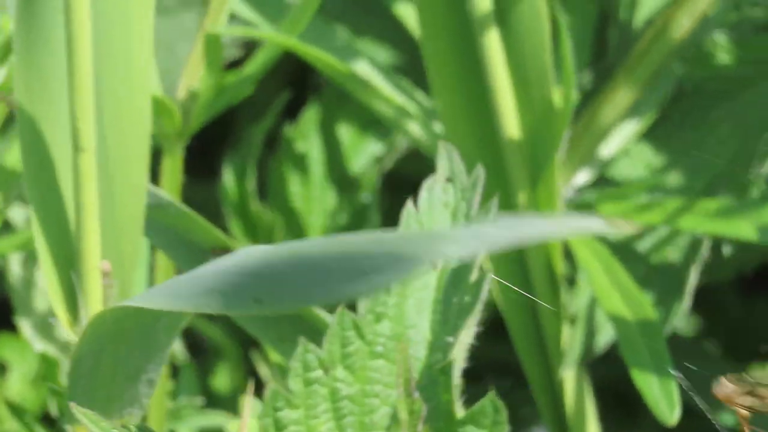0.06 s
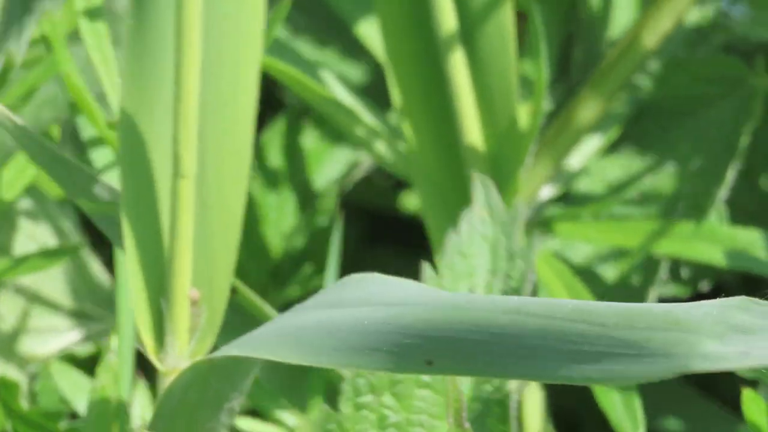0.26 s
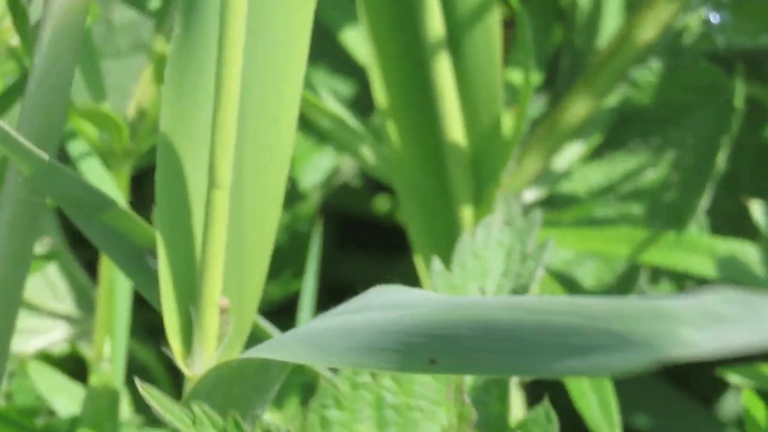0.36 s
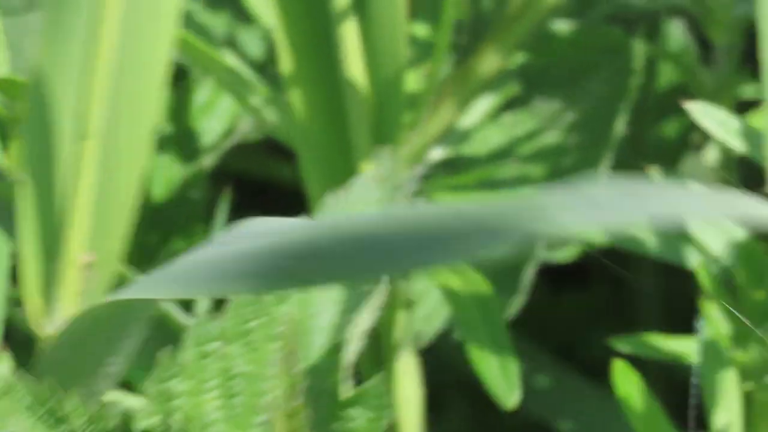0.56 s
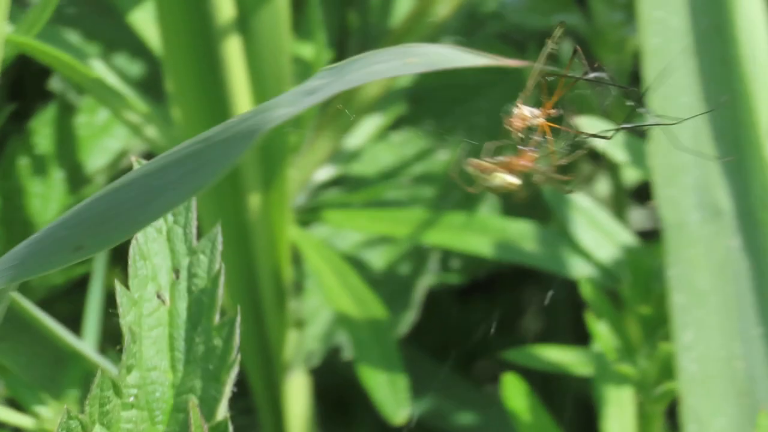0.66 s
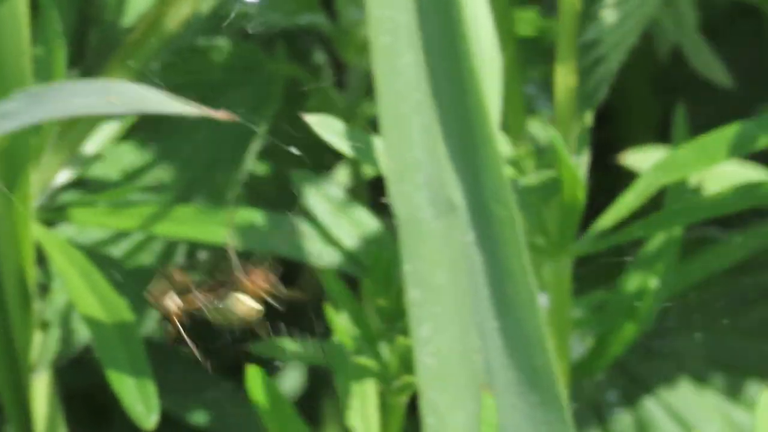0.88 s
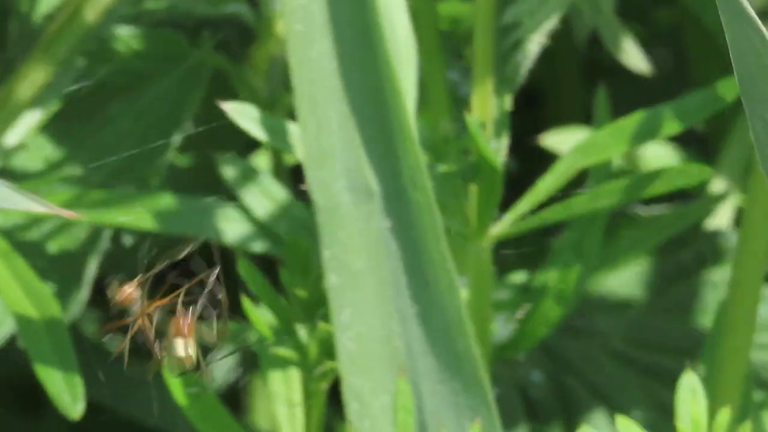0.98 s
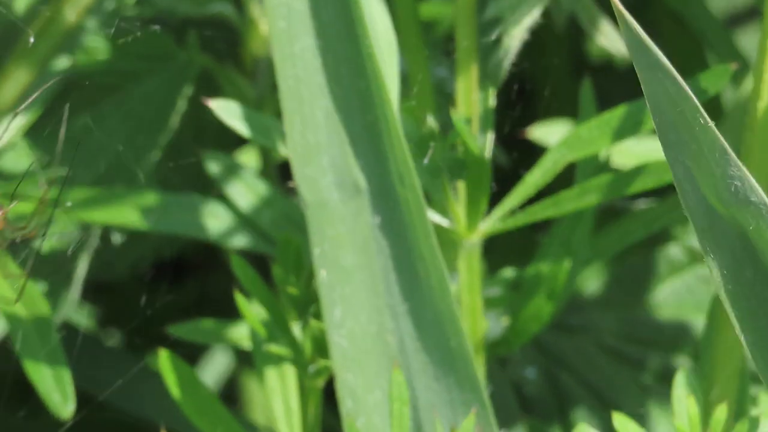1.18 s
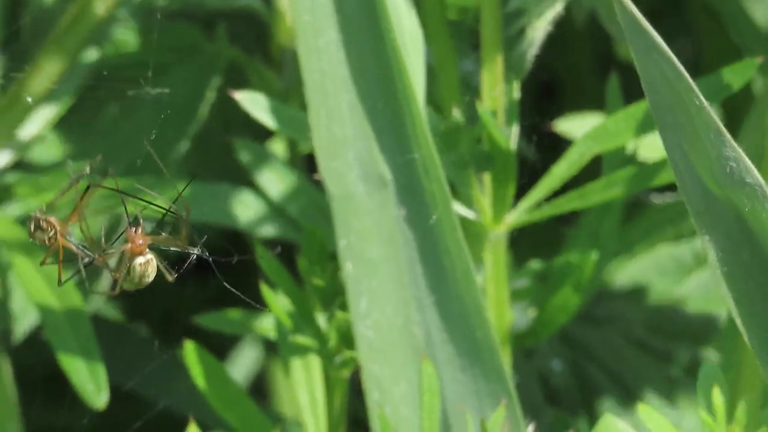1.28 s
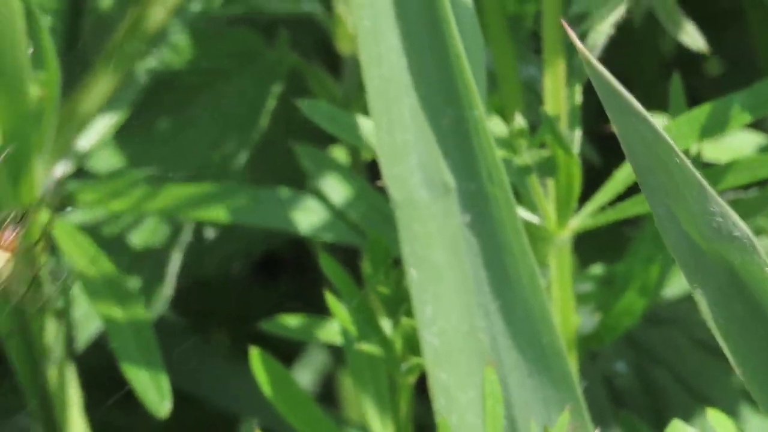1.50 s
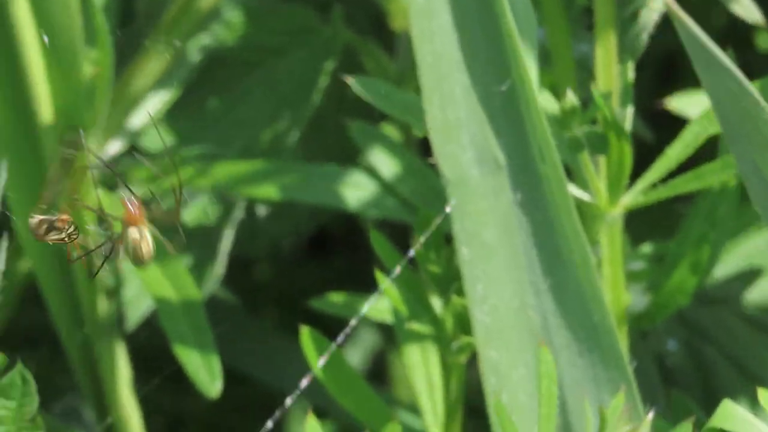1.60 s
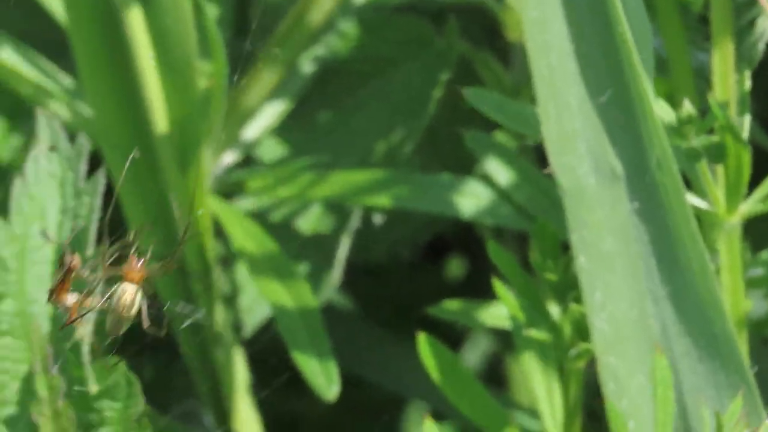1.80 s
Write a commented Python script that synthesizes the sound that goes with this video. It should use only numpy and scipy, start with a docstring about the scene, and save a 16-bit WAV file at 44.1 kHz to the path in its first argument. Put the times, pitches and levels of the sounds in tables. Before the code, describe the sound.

Wind buffets the microphone low among grass, with a lumpy rumble and irregular soft thumps from about 0.2 seconds. A brief airy swish passes at 1.1 seconds, then the strongest gust hits from 1.2 to 1.4 seconds with a breathy hum. The rumble eases but continues until nearly 2 seconds. Behind it lie steady distant rumble, soft leaf hiss and a very faint ringing that swells and fades.

```python
"""Wind gusts right on a camera's two microphone ports, set low among grass and nettles.
Eddies thump the ports over an uneven rumble of turbulent air. The strongest gust blows a breathy
hum in the housing, with a brief swish of passing air just ahead of it.
Farther off lies a steady outdoor wash, distant rumble and leaf hiss, with a faint ringing band."""
import sys
import numpy as np
from scipy import signal
from scipy.fft import rfft, irfft, next_fast_len
from scipy.io import wavfile
from scipy.ndimage import uniform_filter1d

SR = 44100
rng = np.random.default_rng(int(sys.argv[2]) if len(sys.argv) > 2 else 0)


def wrap_up_sound(samples):
    """Save the sound to the file named by the first command line argument, as 16-bit audio."""
    columns = np.atleast_2d(samples).T
    # keep every value between -1 and 1, then stretch to whole-number steps
    tamed = np.clip(columns, -1, 1)
    steps = np.round(tamed * 32767).astype(np.int16)
    wavfile.write(sys.argv[1], SR, steps)


N = 81585
FFT_SIZE = 2 * next_fast_len(N // 2 + SR // 10)
T, HZ = np.arange(N) / SR, np.fft.rfftfreq(FFT_SIZE, 1 / SR)

# Levels in the tables are relative.
# spectra of the distant wash, alike at both ports (mid) and opposed (side): f/Hz, level/dB
WASH_MID_SPECTRUM = [(20, 4.5), (80, 3.5), (200, -0.5), (380, -10.5), (470, -1), (540, -11.5), (620, -9.5),
                     (720, 0), (800, -3), (930, -13.5), (1090, -2), (1220, -18), (1340, -13.5),
                     (1490, -14.5), (1650, -17), (2600, -20.5), (2900, -18.5), (3300, -22.5), (4900, -25.5),
                     (7000, -30.5), (10000, -36.5), (15000, -46)]
WASH_SIDE_SPECTRUM = [(130, -17.5), (260, -0.5), (400, -12), (470, 1.5), (560, 1), (630, -4.5), (730, 4),
                      (910, -7), (1090, -1), (1240, -10.5), (1550, -5.5), (2130, -18), (3000, -16),
                      (3800, -22), (4770, -24), (6270, -29), (8720, -34.5), (15000, -50)]
# swells of the far ringing band: t/s, level/dB
RINGING_LEVEL = [(0, -72), (.27, -61), (.45, -73), (.6, -62), (.85, -61.5), (.97, -64), (1.04, -79),
                 (1.85, -65)]
# spectra of the wind's rumble on the microphone and of its deepest part: f/Hz, level/dB
RUMBLE_SPECTRUM = [(15, -32), (35, -28), (70, 4), (130, 5.5), (190, -4), (250, -8.5), (330, -14.5),
                   (450, -17.5), (550, -38), (1200, -73)]
DEEP_SPECTRUM = [(12, -8), (28, -22), (45, 3), (75, 1.5), (110, -12), (200, -56), (600, -76)]
# push of the wind, and swells of the deepest rumble: t/s, level/dB
WIND_PUSH = [(0, -45.5), (.13, -50.5), (.2, -64), (.25, -33), (.33, -43), (.41, -31.5), (.51, -37.5),
             (.62, -33.5), (.72, -38), (.82, -33), (.89, -45), (1.04, -31), (1.13, -46), (1.17, -47.5),
             (1.21, -20), (1.28, -41), (1.315, -26), (1.36, -38.5), (1.43, -40), (1.47, -35), (1.53, -36),
             (1.6, -39.5), (1.69, -38.5), (1.72, -52.5), (1.8, -35.5), (1.85, -48.5)]
DEEP_SWELLS = [(0, -60), (.1, -49.5), (.155, -41), (.19, -43.5), (.24, -35), (.3, -32), (.33, -48),
               (.38, -29), (.46, -33.5), (.5, -63), (.55, -39.5), (.8, -44), (1.0, -54), (1.4, -56),
               (1.85, -44.5)]
# eddies striking the microphone: t/s, fade/s, level/dB, bass gain/dB, ratio of small eddies to large
EDDY_HITS = [(0.221, 0.0017, -23, 12, 0.13), (.233, .007, -19.5, 8, .45), (0.299, 0.0073, -26.5, 7.5, 0.78),
             (0.329, .004, -37, 6, .5), (.382, 0.0065, -20, 6, 0.62), (.393, 0.0059, -30, 8, 1.75),
             (.616, 0.005, -29.5, 9, 0.91), (0.653, 0.013, -30, -6.5, 0.84),
             (0.678, 0.0038, -28.5, 21, 0.5), (0.717, 0.0046, -30, 32, .5), (.766, 0.0022, -22, 3.5, 0.84),
             (0.772, 0.026, -24.5, 1, 1.9), (.791, 0.007, -25.5, 9.5, 1.35), (0.82, 0.0043, -30.5, 22, .3),
             (.909, 0.0044, -32, 21, 0.39), (.929, 0.0042, -26, 26.5, 0.57), (0.993, .003, -29.5, 5, 0.27),
             (.999, 0.0095, -23.5, 11.5, 0.87), (1.028, 0.0039, -22.5, 6, 0.29),
             (1.034, 0.0027, -22.5, -2, 1.2), (1.0501, .005, -20, 8, 0.18), (1.109, 0.002, -35.5, -32, .6),
             (1.151, .005, -37, -25, 1.6), (1.175, 0.0024, -23.5, -19.5, 0.27),
             (1.1795, 0.0075, -16.5, -22, 0.8), (1.2012, 0.01, -22.5, -16, 0.86),
             (1.2122, 0.0034, -17.5, -16, .5), (1.2244, .007, -21, -27.5, 1.02),
             (1.298, 0.003, -34.5, -4.5, 0.92), (1.310, 0.0035, -25, -29, .7),
             (1.319, 0.0036, -19.5, -13.5, 0.46), (1.333, 0.016, -22, -15, 2.7),
             (1.366, 0.0034, -24, -12, 1.2), (1.384, 0.0042, -26, -9, 1.5), (1.401, 0.0047, -28.5, 7, 0.66),
             (1.4586, 0.0027, -32, -18, 0.48), (1.494, 0.0046, -38, 20, 0.65), (1.5304, 0.0032, -28, 0, .5),
             (1.63, 0.0088, -46, -19, 1.5), (1.765, 0.0057, -32.5, 22, 1.3),
             (1.82, 0.0083, -33.5, 20, 0.96)]
# pressure spectrum of an eddy at the left port: f/Hz, level/dB
EDDY_SPECTRUM = [(20, -26), (45, -5.5), (80, 6), (200, 6), (290, -5), (370, -5), (440, -4.5), (490, -14.5),
                 (550, -36), (750, -37.5), (1300, -57), (3000, -86)]
# wind at the right port against the left: f/Hz, level/dB
RIGHT_PORT_GAIN = [(40, -1.5), (120, 1.5), (200, 4.5), (300, 11), (400, 8.5), (490, 6), (600, 10.5),
                   (800, -19)]
# resonances of the housing: f/Hz, width/Hz, level/dB
HOUSING_MODES = [(1090, 120, 18.5), (700, 120, 6), (453, 120, 10.5), (1450, 400, -7), (2220, 780, -11)]
# hum of the housing through the strongest gust: t/s, level/dB
HOUSING_LEVEL = [(.95, -74), (1.03, -47), (1.1, -44), (1.17, -49), (1.215, -33.5), (1.26, -43), (1.33, -33),
                 (1.38, -50), (1.43, -68)]
# spectrum of air brushing past the microphone: f/Hz, level/dB
AIR_SPECTRUM = [(1200, -3), (1450, -19), (1900, 10.5), (2200, -2), (2900, 2), (3900, -7), (4600, -4),
                (6100, -10), (12000, -26)]


def amp(db):
    """Decibels to gain."""
    return 10 ** (np.asarray(db) / 20)


def unit(x):
    """Scales to rms 1."""
    return x / np.sqrt(np.mean(x ** 2) + 1e-20)


def over_time(points):
    """Joins (t/s, level/dB) points in time."""
    return np.interp(T, *np.transpose(points))


def over_frequency(points):
    """Joins (f/Hz, level/dB) points on a log-frequency axis."""
    hz, db = np.transpose(points)
    return np.interp(np.log(HZ + 1), np.log(hz + 1), db)


def shaped_noise(gain):
    """Noise of rms 1 with the given gain at each frequency."""
    return unit(irfft(rfft(rng.standard_normal(FFT_SIZE)) * gain)[:N])


def noise(spectrum):
    """Noise of rms 1 shaped by (f/Hz, level/dB) points."""
    return shaped_noise(amp(over_frequency(spectrum)))


def steadied(x, span_s):
    """Evens out the slow swells of a noise, holding its rms near 1."""
    power = uniform_filter1d(x ** 2, max(int(span_s * SR), 2))
    return x / np.sqrt(abs(power) + 1e-9)


def resonant_noise(modes):
    """Steady noise in steep-sided resonances (f/Hz, width/Hz, level/dB)."""
    gain = sum(amp(db) / (1 + (2 * (HZ - hz) / width) ** 2) ** 2 for hz, width, db in modes)
    return steadied(shaped_noise(gain), span_s=0.082)


def colour(x, gain_db, late_bias=0.27):
    """Filters by a gain at each frequency, ringing more after a push than before it."""
    cepstrum = irfft(gain_db * np.log(10) / 20)
    cepstrum[1:FFT_SIZE // 2] *= 1 + late_bias
    cepstrum[FFT_SIZE // 2 + 1:] *= 1 - late_bias
    return irfft(rfft(x, FFT_SIZE) * np.exp(rfft(cepstrum)))[:N]


def outdoor_wash(mid_db=-46, side_db=-47.5, mono_below_hz=200):
    """Distant rumble and leaf hiss, coloured by the hollows of the microphone housing."""
    mid = noise(WASH_MID_SPECTRUM) * amp(mid_db)
    bass_cut = HZ / np.hypot(HZ, mono_below_hz)
    side = shaped_noise(amp(over_frequency(WASH_SIDE_SPECTRUM)) * bass_cut) * amp(side_db)
    return np.array([mid + side, mid - side])


def distant_ringing(hz=1470, width_hz=140):
    """A faint narrow band swells and fades far off, centred between the ports."""
    return resonant_noise([(hz, width_hz, 0)]) * amp(over_time(RINGING_LEVEL))


def wind_rumble(lump_db=2, lump_hz=78):
    """Lumpy rumble on the microphone follows the wind's push; its deepest part is strongest early on."""
    lumps = shaped_noise(1 / (1 + (HZ / lump_hz) ** 2))
    body_db = over_time(WIND_PUSH) - 1.5 + lump_db * lumps
    body = steadied(noise(RUMBLE_SPECTRUM), span_s=0.0504) * amp(body_db)
    deep = steadied(noise(DEEP_SPECTRUM), span_s=0.027) * amp(over_time(DEEP_SWELLS))
    return body + deep


def buffet(at_s, fade_s, level_db, bass_db, churn):
    """One large eddy sucks at the port, in a cloud of small ones that swells and dies away."""
    eddies_per_s, rise_s, bass_edge_hz, level_span_s = 1500, 0.0053, 248, 0.015
    small_eddies = rng.standard_normal(N) * (rng.random(N) < eddies_per_s / SR)
    cloud = small_eddies * np.exp(-np.maximum((at_s - T) / rise_s, (T - at_s) / fade_s))
    large_eddy = 1. * (np.arange(N) == round(at_s * SR))
    gain_db = over_frequency(EDDY_SPECTRUM) + bass_db / (1 + (HZ / bass_edge_hz) ** 4)
    pressure = colour(churn * unit(cloud) - unit(large_eddy), gain_db)
    # the thump carries the energy of level_db held for level_span_s
    return amp(level_db) * unit(pressure) * np.sqrt(level_span_s * SR / N)


def wind_on_ports(buffet_gain_db=-4.5, opposed_from_hz=671):
    """Rumble and buffets reach the right port a little later, and stronger in the low mids."""
    left = wind_rumble() + amp(buffet_gain_db) * sum(buffet(*hit) for hit in EDDY_HITS)
    lag_rad = np.pi * np.minimum(HZ / opposed_from_hz, 1) ** 1.7
    right_response = amp(over_frequency(RIGHT_PORT_GAIN)) * np.exp(-1j * lag_rad)
    right = irfft(rfft(left, FFT_SIZE) * right_response)[:N]
    return np.array([left, right])


def housing_hum():
    """The strongest gust blows a breathy hum in the housing, opposed at the two ports."""
    hum = resonant_noise(HOUSING_MODES) * amp(over_time(HOUSING_LEVEL))
    return np.array([hum, -.8 * hum])


def air_hiss(at_s=1.092, width_s=0.04, level_db=-54):
    """Air brushes close past the microphone just ahead of the strongest gust."""
    left = noise(AIR_SPECTRUM)
    right = -.4 * left + 0.79 * noise(AIR_SPECTRUM)
    swell = np.exp(-.5 * ((T - at_s) / width_s) ** 2)
    return np.array([left, right]) * amp(level_db) * swell


def air_swish(at_s=1.097, half_length_s=.05, level_db=-63):
    """A thin, rising band tops the close hiss, starting and stopping quickly."""
    centre_hz, rise_hz_per_s, half_width_hz = 4940, 4000, 450
    cycles = np.cumsum(centre_hz + rise_hz_per_s * (T - at_s)) / SR
    lowpass = 1 / (1 + (HZ / half_width_hz) ** 4)
    bands = [shaped_noise(lowpass) * np.sin(2 * np.pi * (cycles + rng.random())) for port in range(2)]
    swell = np.exp(-abs((T - at_s) / half_length_s) ** 4)
    return unit(np.array(bands)) * amp(level_db) * swell


def scene():
    """Wind right on the microphone, low in the grass, over the distant background."""
    close = wind_on_ports() + housing_hum() + air_hiss() + air_swish()
    return close + outdoor_wash() + distant_ringing()


def record(dry, cutoff_hz=15700):
    """The camera's band limit takes off the highest treble."""
    lowpass = signal.firwin(511, cutoff_hz, window=("kaiser", 9), fs=SR)
    return signal.oaconvolve(dry, lowpass[None], "same")


dry = scene()
out = record(dry)
wrap_up_sound(out)
```